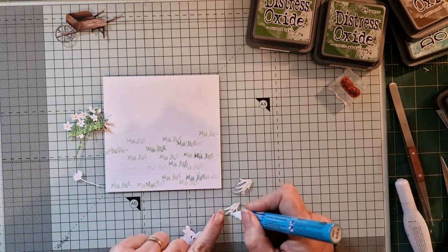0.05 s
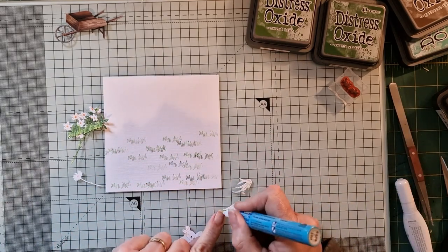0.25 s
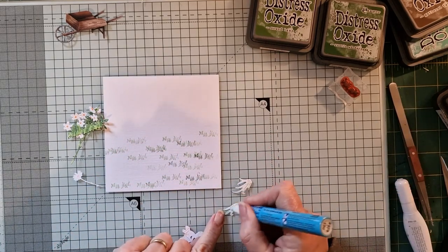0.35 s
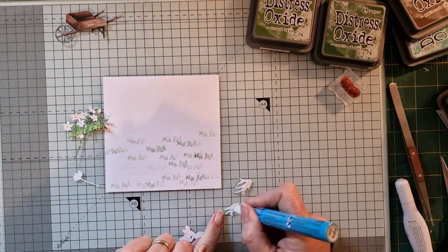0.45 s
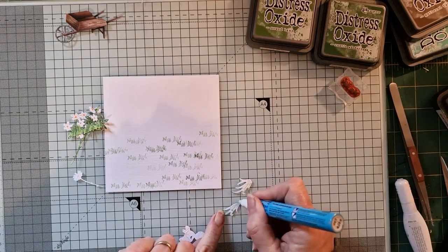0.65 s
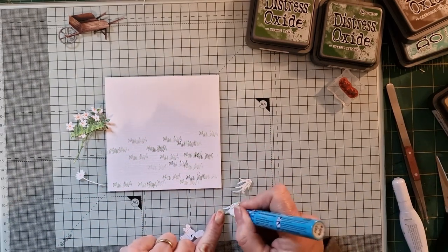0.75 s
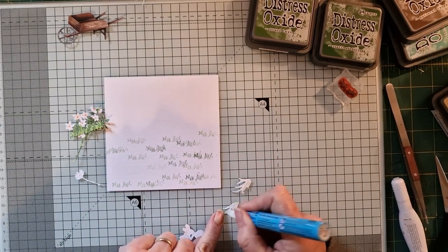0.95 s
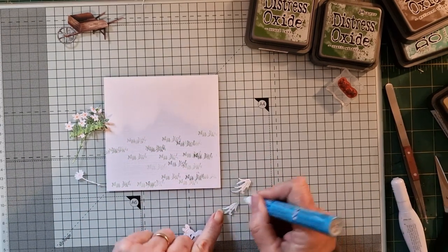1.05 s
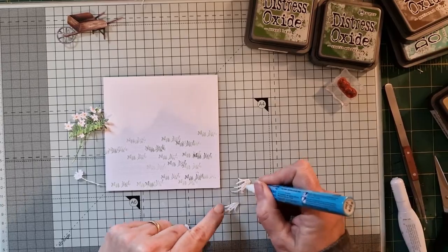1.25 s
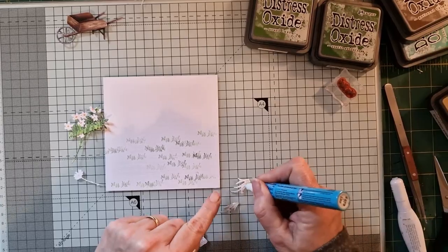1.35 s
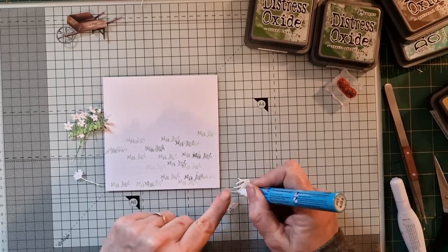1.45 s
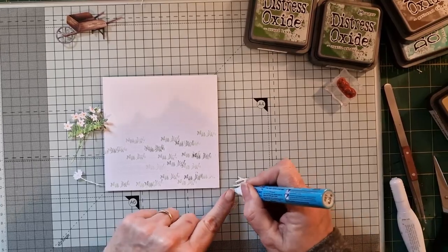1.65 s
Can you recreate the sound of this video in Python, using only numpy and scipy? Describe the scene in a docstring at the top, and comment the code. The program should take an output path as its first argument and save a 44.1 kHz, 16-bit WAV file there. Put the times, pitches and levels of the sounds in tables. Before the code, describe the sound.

A glue pen with a springy tip dabs paper four times, each a soft knock, gritty scrape and click with low table thumps; then faint finger brushing and a sharp little snap, close in a quiet room.

```python
"""Glue pen dabbed on paper.

A spring-tipped pen is dabbed four times on a paper cut-out on a cutting mat; soft pushes swing table modes.
Landings, barrel catches and gritty slides of the tip excite the pen's spring and case modes.
A finger brushes the mat and paper slides: filtered random slips under a faded pressure.
The tip scuffs and snaps on the next piece: highpassed modes. Noise and two tones make room air and a low hum.
"""
import sys
import numpy as np
from scipy import signal
from scipy.fft import rfft, irfft
from scipy.io import wavfile

SR = 44100
rng = np.random.default_rng(int(sys.argv[2]) if len(sys.argv) > 2 else 0)


def materialize(psi):
    """Save the field psi as 16-bit PCM at rate SR to the path in sys.argv[1].

    A 1-D psi becomes a single channel; in a 2-D psi each row is a channel.
    """
    bounded = np.clip(np.atleast_2d(psi).T, -1, 1)
    quanta = np.round(bounded * 32767).astype(np.int16)
    wavfile.write(sys.argv[1], SR, quanta)


N = 74970


def undb(db):
    """Decibels to amplitude gain."""
    return 10 ** (np.asarray(db) / 20)


def seconds():
    """Time of every sample."""
    return np.arange(N) / SR


def unit(x):
    """Scale a response to unit energy."""
    return x / np.sqrt(np.sum(x ** 2))


def through(x, response):
    """Convolve a sound with a response."""
    return signal.fftconvolve(x, response)[:N]


def colour(points):
    """Minimum-phase filter response with the given (f/Hz, level/dB) curve."""
    hz, db = np.array(points, float).T
    size = 8192
    curve_db = np.interp(np.log(np.fft.rfftfreq(size, 1 / SR) + 1), np.log(hz), db)
    # folding the cepstrum onto positive time makes the response causal
    cepstrum = irfft(np.log(undb(curve_db)))
    cepstrum[1:size // 2] *= 2
    cepstrum[size // 2 + 1:] = 0
    return irfft(np.exp(rfft(cepstrum)))


def fade(t60_s):
    """Exponential decay, 60 dB in t60_s."""
    return np.exp(-np.log(1000) * seconds() / t60_s)


def ring(modes):
    """Sum of damped sines, one per (f/Hz, t60/s, level/dB)."""
    t = seconds()
    return sum(undb(db) * fade(t60_s) * np.sin(2 * np.pi * hz * t) for hz, t60_s, db in modes)


def burst(t60_s):
    """Decaying noise of unit energy."""
    return unit(rng.standard_normal(N) * fade(t60_s))


def strikes(rows, response):
    """Sound a peak-normalized response at each (t/s, level/dB)."""
    hits = np.zeros(N)
    for at, db in rows:
        hits[int(at * SR)] += undb(db)
    return through(hits, response / np.abs(response).max())


def slips(rate_per_s, scatter_db):
    """Random tiny slips of uneven size and either sign, rms 1."""
    happens = rng.random(N) < rate_per_s / SR
    size = undb(scatter_db * np.minimum(rng.exponential(size=N), np.pi))
    x = happens * size * rng.choice([-1, 1], N)
    return x / x.std()


LEFT_OVER_RIGHT_DB = 1.53
MIC_LAG_S = 0.00015
DESK_T60_S, DESK_DB = 0.02, -6
ROOM_T60_S = 0.18


def pan(left_over_right_db):
    """Left and right gains, half the difference each way."""
    return undb(np.array([[left_over_right_db], [-left_over_right_db]]) / 2)


def place(x, width, left_over_right_db, room_db):
    """Two spaced mics hear the treble out of step; desk reflections widen it, a room tail follows."""
    hz = np.fft.rfftfreq(N, 1 / SR)
    points, db = np.array(width, float).T
    spread = undb(np.interp(np.log(hz + 1), np.log(points), db))
    lagged = 1j * np.sqrt(2) * np.sin(2 * np.pi * hz * MIC_LAG_S) * rfft(x)
    desk = undb(DESK_DB) * rfft(through(x, burst(DESK_T60_S)))
    side = irfft(spread * (lagged + desk), N)
    tail = np.array([through(x, burst(ROOM_T60_S)) for _ in range(2)])
    return np.array([x + side, x - side]) * pan(left_over_right_db) + undb(room_db) * tail


# air noise spectrum: f/Hz, relative level/dB
AIR_SPECTRUM = [(20, -12), (60, -14), (95, -10), (135, -6), (180, -10.5), (220, -17.5), (290, -27),
                (800, -29), (1200, -34), (2000, -34.5), (4500, -39), (7300, -42.5), (10000, -53.5),
                (16000, -53)]
# air noise, side against mid: f/Hz, level/dB
AIR_SIDE = [(60, -1), (130, -7.5), (400, -1.5), (1300, -0.5), (15000, -1)]
# hum tones: f/Hz, rms level/dB
HUM_TONES = [(119.6, -66), (166.5, -71.5)]
AIR_MID_RMS_DB = -71


def room():
    """Coloured noise for air, wide in stereo; two steady low tones for hum."""
    air = unit(colour(AIR_SPECTRUM))
    mid, side = (through(rng.standard_normal(N), air) * undb(AIR_MID_RMS_DB) for _ in range(2))
    side = through(side, colour(AIR_SIDE))
    hum = sum(np.sqrt(2) * undb(db) * np.sin(2 * np.pi * (hz * seconds() + rng.random()))
              for hz, db in HUM_TONES)
    return np.array([mid + side, mid - side]) + hum


# tip lands softly on the paper: t/s, dull knock level/dB, papery tap level/dB
TIP_LANDINGS = [(0.2291, -61.5, -52.5), (0.528, -49.5, -57), (0.7618, -48, -50.5), (0.987, -47, -65.5)]
# tip catches in its barrel: t/s, dull knock level/dB, bright tick level/dB
BARREL_CATCHES = [(0.272, -52, -53.5), (0.305, -45.5, -64), (0.558, -45, -66), (0.635, -39, -68),
                  (0.783, -45.5, -64), (0.8245, -41, -43.5), (1.0265, -39.5, -43.5)]
# pen modes: f/Hz, t60/s, relative level/dB
SPRING_MODES = [(598, .05, -11), (661, 0.038, -11), (712, 0.037, -4.5), (790.8, 0.055, 0.5), (830, 0.07, 0),
                (968.4, 0.05, -3), (1074, 0.031, -10), (1143, 0.084, -6), (1226.4, 0.065, -5.5),
                (1559, .09, -7), (2015, .085, -11.5), (2520, 0.066, -14.5), (2686, 0.074, -11.5),
                (3164, 0.053, -5), (4170, 0.096, -10.5), (5820, 0.043, -14), (6167, 0.034, -1.5)]
# spectra of judder, grit, tap and knock: f/Hz, relative level/dB
JUDDER_SPECTRUM = [(200, -27), (400, -7), (480, -15), (620, 1), (950, -5.5), (1400, -5.5), (2500, -7),
                   (5000, -24), (16000, -37)]
GRIT_SPECTRUM = [(300, -29), (480, -2.5), (700, -13.5), (1400, 2), (2300, 2), (3300, 4), (4600, -4.5),
                 (6500, 4), (8500, -2.5), (10500, -11), (16000, -8)]
TAP_SPECTRUM = [(300, -12.5), (900, 1), (2200, -10.5), (3700, 3), (5000, -16), (6200, -5.5), (8500, -8),
                (10500, -19), (16000, -24)]
KNOCK_SPECTRUM = [(200, -28.5), (400, -9), (480, -18), (620, 1.5), (850, -1.5), (1200, -4.5), (2000, -15.5),
                  (5000, -21), (16000, -50)]
CASE_T60_S, CASE_DB = 0.022, -9
GRIT_RING_DB, GRIT_CASE_DB, KNOCK_RING_DB = -5, -8, -5
TAP_RISE_S, TAP_T60_S, TICK_T60_S = 0.003, 0.026, 0.0054


def pen(judder, grit):
    """Friction and knocks ring spring and case; grit and knocks also sound straight from the tip."""
    direct = signal.unit_impulse(N)
    # alternating signs between neighbouring modes
    spring = unit(sum((-1) ** k * ring([mode]) for k, mode in enumerate(SPRING_MODES)))
    case = burst(CASE_T60_S)
    dull = unit(through(spring + undb(CASE_DB) * case, colour(JUDDER_SPECTRUM)))
    grit_body = direct + undb(GRIT_RING_DB) * spring + undb(GRIT_CASE_DB) * case
    bright = unit(through(grit_body, colour(GRIT_SPECTRUM)))

    tap_noise = burst(TAP_T60_S) * np.minimum(seconds() / TAP_RISE_S, 1)
    tap = through(tap_noise, colour(TAP_SPECTRUM))
    tick = through(burst(TICK_T60_S), bright)
    knock = through(direct + undb(KNOCK_RING_DB) * spring, colour(KNOCK_SPECTRUM))

    knocks = strikes([(at, db) for at, db, _ in TIP_LANDINGS + BARREL_CATCHES], knock)
    ticks = strikes([(at, db) for at, _, db in BARREL_CATCHES], tick)
    taps = strikes([(at, db) for at, _, db in TIP_LANDINGS], tap)
    return through(judder, dull) + through(grit, bright) + knocks + ticks + taps


# dabs, also used by table(): contact t/s, thump relative level/dB, slide start t/s,
# grit peak time t/s (in the last dab set past the lift), slide end t/s, judder level/dB, grit level/dB
PEN_DABS = [(0.2336, -3, 0.31, 0.38, 0.4, -49.5, -59.5), (0.533, -1, 0.57, 0.61, 0.64, -46, -55.5),
            (0.766, -2.5, 0.783, 0.821, 0.8392, -48, -55), (0.9879, 2, 0.99, 1.1, 1.0385, -47, -53)]
JUDDER_PER_S, JUDDER_SCATTER_DB = 1100, 2.5
GRIT_PER_S, GRIT_SCATTER_DB = 6000, 3
PRESS_JUDDER_DB, PRESS_GRIT_DB = -12.5, -15.5  # tip held down before sliding
JUDDER_SAG_DB, GRIT_SAG_DB, RELEASE_DB_PER_S = -11, -5, 654
GRIT_RISE_POWER = 2.63


def friction():
    """Stick-slip of the sliding tip: judder steps up at once, grit grows toward its peak time."""
    t, judder, grit = seconds(), np.zeros(N), np.zeros(N)
    for contact, _, start, grit_peak, end, judder_db, grit_db in PEN_DABS:
        touch = (t > contact) * undb(-RELEASE_DB_PER_S * np.maximum(t - end, 0))
        travel = np.clip((t - start) / (end - start), 0, 1)
        judder_shape_db = np.where(t < start, PRESS_JUDDER_DB, JUDDER_SAG_DB * travel)
        judder += touch * undb(judder_db + judder_shape_db)
        before = np.interp(t, [start, grit_peak], [1, 0])
        after = np.interp(t, [grit_peak, end], [0, 1])
        grit_shape_db = PRESS_GRIT_DB * before ** GRIT_RISE_POWER + GRIT_SAG_DB * after ** 2
        grit += touch * undb(grit_db + grit_shape_db)
    return judder * slips(JUDDER_PER_S, JUDDER_SCATTER_DB), grit * slips(GRIT_PER_S, GRIT_SCATTER_DB)


# table modes: f/Hz, t60/s, relative level/dB, swing direction (sign)
TABLE_SWINGS = [(42.4, 0.28, -37.5, -1), (55.3, .21, -27, 1), (61, 0.1, -29, -1), (134.7, 0.33, -42, -1),
                (206.2, 0.25, -48, -1)]
PUSH_S = 0.0061
LIFT_DB, TABLE_RUB_DB = -20, -8.5  # rebound at lift against push; judder into table


def push(at):
    """Smooth squared-sine force pulse of unit sum."""
    phase = np.clip((seconds() - at) / PUSH_S, 0, 1)
    return np.sin(np.pi * phase) ** 2 / (PUSH_S * SR / 2)


def table(judder):
    """Dabs push the table modes, lifting springs them back a little, judder shakes them."""
    force = sum(undb(db) * (push(contact) - undb(LIFT_DB) * push(end))
                for contact, db, _, _, end, *_ in PEN_DABS)
    swing = sum(np.sign(way) * ring([(hz, t60_s, db)]) for hz, t60_s, db, way in TABLE_SWINGS)
    shaken = undb(TABLE_RUB_DB) * through(judder, unit(swing))
    return (through(force, swing) + shaken) * pan(LEFT_OVER_RIGHT_DB)


def rub(rows, spectrum, fade_s):
    """Light strokes: coloured random slips under a pressure that ramps in and out."""
    t = seconds()
    pressure = sum(undb(db) * np.clip(np.minimum(t - at, at + length - t) / fade_s, 0, 1)
                   for at, length, db in rows)
    return through(pressure * slips(GRIT_PER_S, GRIT_SCATTER_DB), unit(colour(spectrum)))


# finger strokes: start t/s, length/s, level/dB
FINGER_STROKES = [(1.07, 0.15, -75.5), (1.19, 0.33, -79), (1.42, 0.24, -82)]
# stroke spectrum: f/Hz, relative level/dB
FINGER_SPECTRUM = [(200, -2.5), (700, -1.5), (1500, -8), (3000, -14), (7500, -16), (10000, -30.5),
                   (16000, -22.5)]
RUB_FADE_S = 0.029


def finger():
    """A finger brushing the mat: slips weighted to the lows and mids."""
    return rub(FINGER_STROKES, FINGER_SPECTRUM, RUB_FADE_S)


# paper swishes: start t/s, length/s, level/dB
PAPER_SWISHES = [(1.205, 0.099, -81), (1.29, 0.13, -78.5), (1.485, 0.07, -79)]
# swish spectrum: f/Hz, relative level/dB
PAPER_SPECTRUM = [(2000, -20), (4200, -5), (5100, 11), (6000, -11), (12000, -36)]


def paper():
    """Paper sliding on the mat: slips through a narrow treble peak."""
    return rub(PAPER_SWISHES, PAPER_SPECTRUM, RUB_FADE_S)


# tip scuffs: start t/s, length/s, level/dB
SNAP_SCUFFS = [(1.402, 0.01527, -57)]
# scuff spectrum: f/Hz, relative level/dB
SCUFF_SPECTRUM = [(500, -47), (2000, -1), (4200, 6), (6000, -10), (8000, -10.5), (14000, -11.5),
                  (16000, -25)]
# snap and rebounds: t/s, level against first blow/dB
SNAP_BLOWS = [(1.4128, 0), (1.41422, -3), (1.4171, -11)]
# click modes: f/Hz, t60/s, relative level/dB
CLICK_MODES = [(1445, 0.019, -15), (3630, 0.0038, 0.5), (4060, 0.011, -8), (5800, 0.0029, -25.5)]
SCUFF_FADE_S = 0.00067
SNAP_LOW_HZ, SNAP_DB = 1050, -35


def snap():
    """The tip scuffs the next piece, snaps and rebounds; so small a thing gives off no bass."""
    highpass = signal.butter(2, SNAP_LOW_HZ, "highpass", fs=SR, output="sos")
    click = signal.sosfilt(highpass, ring(CLICK_MODES))
    scuff = rub(SNAP_SCUFFS, SCUFF_SPECTRUM, SCUFF_FADE_S)
    return scuff + undb(SNAP_DB) * strikes(SNAP_BLOWS, click)


# stereo spread of pen and handling: f/Hz, side level/dB
PEN_SIDE = [(60, -25), (200, 6), (700, -14), (1300, -8), (2400, 4.5), (4400, -0.5), (15000, -1.5)]
# stereo spread of the snap: f/Hz, side level/dB
SNAP_SIDE = [(1300, -15), (4400, -5.5), (8000, 4), (15000, 4)]
PEN_ROOM_DB, SNAP_ROOM_DB = -32, -12


def scene():
    """Room, dabs, handling and snap at the craft table."""
    background = room()
    judder, grit = friction()
    handling = finger() + paper()
    dabbing = place(pen(judder, grit) + handling, PEN_SIDE, LEFT_OVER_RIGHT_DB, PEN_ROOM_DB)
    snapping = place(snap(), SNAP_SIDE, 0, SNAP_ROOM_DB)
    return background + dabbing + table(judder) + snapping


TOP_HZ = 15850


def record(dry):
    """The recorder cuts the top with a steep elliptic lowpass."""
    lowpass = signal.ellip(10, 0.2, 70, TOP_HZ, fs=SR, output="sos")  # ripple/dB, stopband/dB
    return signal.sosfilt(lowpass, dry)


dry = scene()
out = record(dry)
materialize(out)
```